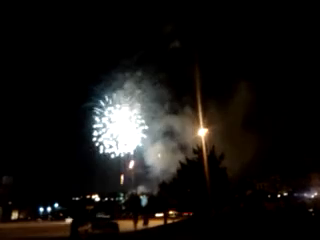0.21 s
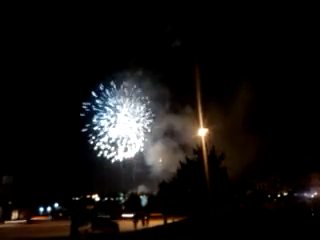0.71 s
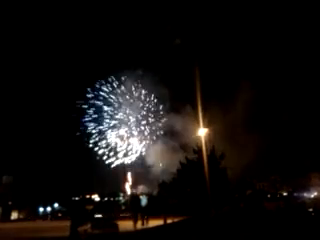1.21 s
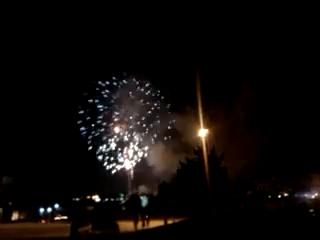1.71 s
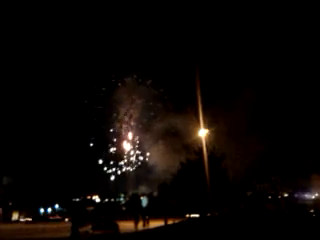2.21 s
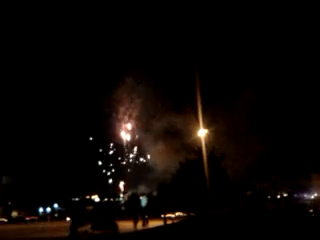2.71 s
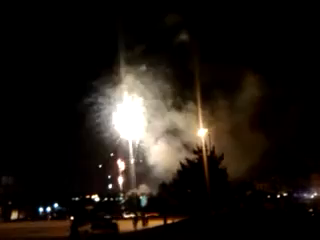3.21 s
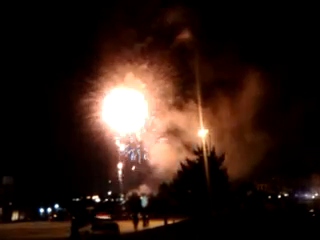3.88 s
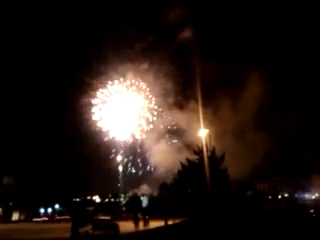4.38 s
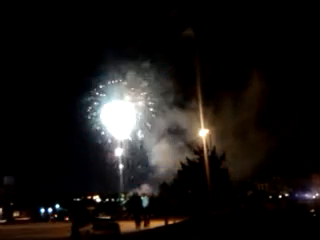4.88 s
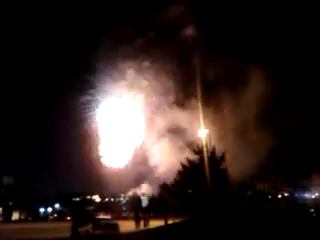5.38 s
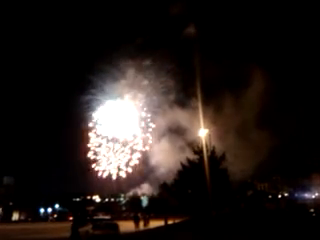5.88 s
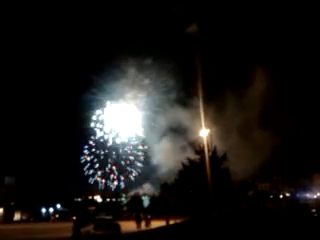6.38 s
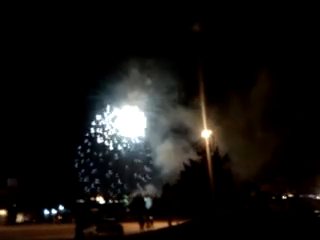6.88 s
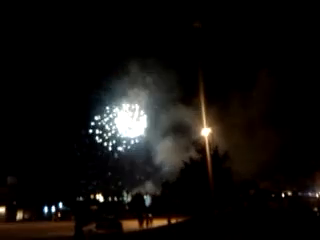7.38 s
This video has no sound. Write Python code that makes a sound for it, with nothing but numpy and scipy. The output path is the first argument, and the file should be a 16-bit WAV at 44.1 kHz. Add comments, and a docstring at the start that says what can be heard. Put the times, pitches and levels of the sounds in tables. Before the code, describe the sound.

Fireworks burst far above an open car park at night. Each shell gives a sharp crack and a low boom, arriving in quick clusters with short gaps and growing densest in the second half. Buildings throw back slaps and an uneven rumble over town hiss and tiny far pops. A cricket chirps faintly twice. A small phone microphone makes it all sound narrow, clipping on the loudest booms.

```python
"""Fireworks over a car park

Shells burst far above an open car park at night, each a sharp crack followed by a dispersed boom.
Buildings send back slaps and a lumpy roll over town noise and far pops; a cricket chirps in two gaps.
A small phone hears it all, passing little above a telephone band and clipping on the loudest booms."""
import sys
import numpy as np
from scipy import signal
from scipy.fft import rfft, irfft
from scipy.io import wavfile
from scipy.ndimage import uniform_filter1d

SR = 44100
rng = np.random.default_rng(int(sys.argv[2]) if len(sys.argv) > 2 else 0)


def put_to_file(sound):
    """Save the sound as 16-bit audio at rate SR, in the file named by the first command-line argument."""
    columns = np.atleast_2d(sound).T  # one column per channel
    safe = np.clip(columns, -1, 1)
    whole_steps = np.round(safe * 32767)
    wavfile.write(sys.argv[1], SR, whole_steps.astype(np.int16))


N = 332955
T = np.arange(N) / SR


def undb(db):
    return 10 ** (np.asarray(db) / 20)


def fall(t, t60):
    """Decay that loses 60 dB in t60 seconds."""
    return np.exp(-np.log(1000) * t / t60)


def coloured(noise, spectrum):
    """Noise shaped by an EQ curve of (Hz, dB) points; rms 1."""
    hz, db = np.transpose(spectrum)
    bins_hz = np.fft.rfftfreq(len(noise), 1 / SR) + 1
    eq = undb(np.interp(np.log(bins_hz), np.log(hz), db))
    shaped = irfft(rfft(noise) * eq, len(noise))
    return shaped / np.sqrt(np.mean(shaped ** 2))


def wander(rate_hz):
    """Smooth random modulation with a spread near 1."""
    hold = int(SR / rate_hz)
    steps = np.repeat(rng.standard_normal(N // hold + 1), hold)
    return 1.24 * uniform_filter1d(uniform_filter1d(steps, hold), hold)[:N]


def lumpy(spectrum, lump_db=0.0, lump_hz=210):
    """Coloured noise with a slow sway in level and optional quicker lumps."""
    level_db = lump_db * wander(lump_hz) + 1.38 * wander(5.5)
    return undb(level_db) * coloured(rng.standard_normal(N), spectrum)


# Level curves for the bed of town noise and far bursts: time_s, rumble_db, hiss_db
TOWN_LEVELS = [(0.0, -32, -43.5), (0.5, -36.5, -45.5), (1.2, -34, -46), (2.3, -31.5, -43),
               (3.0, -35.5, -42.5), (3.8, -30.5, -41), (4.2, -30.5, -42), (5.4, -29.5, -40.5),
               (5.9, -32.5, -43.5), (7.0, -32, -39.5), (7.55, -31.5, -43)]
def town_bed():
    """The distant town drifts in level; returns the power of its rumble and of its hiss."""
    time_s, rumble_db, hiss_db = np.transpose(TOWN_LEVELS)
    return undb(np.interp(T, time_s, rumble_db)) ** 2, undb(np.interp(T, time_s, hiss_db)) ** 2


# EQ of the low roll, fullest near 150 Hz: frequency_hz, gain_db
RUMBLE_EQ = [(15, -80.5), (25, -67), (89, -7.5), (129, -1), (154, 1), (224, -6), (284, -7), (500, -24.5),
             (650, -49.5), (1100, -120)]
def rumble(power):
    """Town rumble and booms returning off buildings merge into one lumpy roll."""
    return np.sqrt(power) * lumpy(RUMBLE_EQ, lump_db=2.38, lump_hz=30)


# EQ of the midrange hiss: frequency_hz, gain_db
HISS_EQ = [(240, -14.5), (400, 2.5), (476, -6), (647, -0.5), (738, -0.5), (2570, -7.5), (3250, -9.5),
           (4110, -22.5), (4600, -63.5), (5980, -86), (10100, -120)]
def hiss(power):
    """Town hiss and the far wash of the cracks, with a light flutter."""
    return np.sqrt(power) * lumpy(HISS_EQ, lump_db=1.39, lump_hz=56)


def far_pops(scatter_db, t60, count):
    """Small far pops, each ringing briefly at its own pitch; rms 1."""
    out, t = np.zeros(N + SR), T[:SR // 25]
    for when, pitch, faintness in rng.random((count, 3)):
        i = int(when * N)
        ring = np.sin(2 * np.pi * 450 * 8 ** pitch * t) * fall(t, t60)  # 450 to 3600 Hz
        gain = undb(-scatter_db * np.log(faintness + 0.038)) / 1.6 ** pitch
        out[i:i + len(t)] += gain * ring
    return out[:N] / np.sqrt(np.mean(out[:N] ** 2))


def crack(t, pitch_hz, knock_db, noise, t60):
    """A shock front: a blast pulse the microphone's bass cut turns into a knock, a snap, ragged noise."""
    late = (t - .001).clip(0)
    blast = -(1 - late / 0.0017) * np.exp(-late / 0.004) * (1 - np.exp(-late / 0.000081))
    bass_cut = signal.cheby1(4, 2., 170, "high", fs=SR, output="sos")
    knock = signal.sosfilt(bass_cut, blast + 1e-18)
    snap = -np.sin(2 * np.pi * pitch_hz * t) * fall(t, 0.53 * t60) * (1 - np.exp(-t / .0004))
    ringing = signal.lfilter(*signal.iirpeak(min(pitch_hz, 4000), Q=3., fs=SR), noise)
    ragged = (undb(-9) * noise + undb(0.5) * ringing) * fall(t, t60) * (1 - np.exp(-t / 0.0011))
    return undb(knock_db) * knock + undb(-2) * snap + ragged


def boom(t, pitch_hz, length_s):
    """The lows come a little late: a few cycles swell fast, slide down in pitch and stop."""
    turns = pitch_hz * (t + .003 * (1 - np.exp(-t / 0.0089)))
    progress = np.clip(t / length_s, 0, 1)
    swell = (1 - np.exp(-t / 0.0026)) ** 2 * (1 - progress ** 2) ** 1.11
    # A deep thump, as from the phone overloading on big booms.
    overload_thump = np.sin(2 * np.pi * progress) * np.sin(np.pi * progress)
    return -np.sin(2 * np.pi * turns + .5) * swell + undb(-30) * overload_thump


# EQ of the cracks and their echoes, where the phone's top resonance rasps: frequency_hz, gain_db
RASP_EQ = [(240, -21), (400, 1.5), (590, -4.5), (640, -12), (1090, -4.5), (1490, -10.5), (1760, -7.5),
           (3350, -9), (4600, -33), (5980, -69.5), (10100, -120)]
# Bangs, one a row: shell bursts, their fore-cracks and single slaps off walls.
# start_s, crack_db, crack_hz, knock_db (re crack), boom_db, boom_hz, boom_cycles, echo_db (re bang)
BANGS = [(0.081, -29.5, 1770, -12, -31.5, 229, 3.3, -15), (0.187, -23.5, 980, 9, -18, 146, 3.7, -26),
         (0.833, -29, 600, 5, -10, 108.6, 3.7, -20), (0.837, -5, 830, -12, 2.5, 152.6, 2.9, -20.5),
         (0.879, -16.5, 3080, 7, -14, 160, 5, -20.5), (0.894, -12.5, 590, 2, -14.5, 133, 2.1, -18),
         (0.902, -12.5, 590, 12.5, -18, 246, 7, -14), (0.913, -11.5, 1140, -3, -17.5, 210, 5.5, -16),
         (0.949, -26, 654, -8, -13.5, 181, 3.6, -21.5), (1.281, -16, 680, 15.5, 1.5, 174.7, 3.8, -15.5),
         (1.293, -4.5, 700, 0, -1.5, 163.5, 3.5, -15), (1.35, -11.5, 1720, 3, -11, 228, 6.5, -14),
         (1.371, -10, 1830, 4, -13, 208, 6.9, -18), (1.381, -1.5, 617, 3.5, -0.5, 151.3, 4.9, -17.5),
         (1.424, -18.5, 3470, -11, -11.5, 180, 3.7, -14), (1.449, -4, 1110, -7, -16.5, 152, 2.9, -18.5),
         (1.905, -19.5, 2720, 18.5, -9.5, 170, 3, -16.5), (1.993, -16, 684, 10.5, -17, 168, 2.7, -21),
         (2.026, -11.5, 1000, 8, -12.5, 187, 2.5, -15.5), (2.058, -14, 1050, 11, -33, 176, 2.3, -17.5),
         (2.437, -2.5, 630, 3.5, 2.5, 167.7, 3, -15), (2.454, -7, 860, -9, 1.5, 139, 2.6, -16),
         (2.468, -22, 920, -1, -6.5, 169, 5.3, -20.5), (2.48, -9.5, 960, -6, -2.5, 158, 3.4, -20),
         (2.509, -19.5, 3440, -0.5, -17, 194, 2.6, -10), (2.556, -20, 3280, 1, -11, 172.5, 3.4, -13.5),
         (2.877, -23.5, 644, 8, -17, 132, 2.4, -20), (3.026, -20.5, 745, 7.5, -15.5, 117, 2.8, -18.5),
         (3.07, -8.5, 746, 0, -9, 246, 6.1, -15), (3.075, -6, 640, 2, 2.5, 161.6, 3.2, -14.5),
         (3.097, -24, 614, 2, -1, 144.5, 2.45, -15), (3.11, -13, 870, 5.5, -7.5, 201, 2.6, -16),
         (3.124, -8, 910, 4.5, -6.5, 177, 3.6, -17), (3.151, -25, 2770, 7, -14, 150, 6.1, -11.5),
         (3.184, -14, 590, 9, -11, 168.4, 4.2, -18.5), (3.199, -30.5, 920, 0.4, -8.5, 119, 2.4, -19),
         (3.499, -12.5, 1525, -5, -18, 141, 1.8, -27), (3.533, -17, 1040, 3, -17.5, 193, 3.3, -26),
         (3.538, -12.5, 1640, -12, -15.5, 181, 2.7, -22.5), (3.604, -25, 1160, 10, -26, 220, 2.8, -16),
         (4.162, -8.5, 577, 9, 0, 187, 1.53, -16), (4.169, -4.5, 750, 5, 1.5, 147.5, 3.7, -15.5),
         (4.181, -9.5, 1130, 8.5, -2, 151, 2.4, -20.5), (4.202, -13, 1360, 2, -21, 143, 2.7, -12),
         (4.226, -2.5, 1050, -9, -25, 189, 4, -8), (4.269, -9.5, 720, 4, -17, 123, 3.5, -12),
         (4.465, -6, 926, 3, 0.5, 176.7, 5.4, -16), (4.508, -20, 1050, 12, -21, 210, 3.4, -17),
         (4.597, -8.5, 947, 12.5, -2.5, 195, 4.4, -17.5), (4.613, -17.5, 604, 16, -5, 121, 2.7, -14),
         (4.655, -2, 680, 1.5, -7.5, 160, 1.7, -19.5), (4.683, -7.5, 1000, 5, -0.5, 204.6, 3.3, -15),
         (4.725, -16.5, 1410, -11, -9, 127, 4.7, -18), (4.758, -9.5, 1740, -5, -7, 193, 2.9, -18),
         (4.929, -37, 700, -1, -12, 165, 3.1, -28), (5.155, -27.5, 1230, 6.5, -22.5, 142, 4, -13),
         (5.56, -32.5, 1010, -3, -23, 160, 4.4, -20.5), (5.822, -38, 600, 2, -24, 162, 6.3, -24.5),
         (5.974, -7.5, 930, -7, 1.5, 151, 3.5, -11.5), (5.994, -6.5, 595, 4.5, 4.5, 117.7, 2.7, -19.5),
         (6.023, -8, 603, 4, -10, 212, 3.4, -18.5), (6.071, -14.5, 960, -3, -14.5, 109, 2.9, -10.5),
         (6.097, -6, 676, 10.5, 0.5, 173.5, 3.4, -17.5), (6.118, -25, 3330, 5, -6.5, 154, 5.3, -16.5),
         (6.148, -5.5, 705, -4, 0, 214, 4.6, -16.5), (6.25, -21, 960, 5, -14, 187, 5.3, -19),
         (6.305, -6.5, 748, 5, -11, 234, 3.8, -22), (6.601, -24.5, 1070, 4, -20.5, 151, 3.8, -21.5),
         (6.658, -22.5, 775, 7, -34, 131, 1.9, -21.5), (6.731, -41, 614, -2, -19, 121, 4.9, -18),
         (6.78, -10, 980, 6.5, 0.5, 197.6, 3.4, -15.5), (6.853, -19, 740, 9, -23.5, 238, 6.8, -15),
         (6.894, -19.5, 2690, -1.5, -14.5, 185, 2.8, -16.5), (7.273, -22.5, 860, 6.5, -20, 199, 3.2, -22),
         (7.48, -31, 1690, 14, -21, 164, 3.6, -21)]
def bangs():
    """Each bang layers a crack and a boom; returns them and the power sent to low and high echoes."""
    out, low_send, high_send = np.zeros(N + SR), np.zeros(N), np.zeros(N)
    t = T[:SR // 4]
    noise = coloured(rng.standard_normal(N + SR), RASP_EQ)
    for start_s, crack_db, crack_hz, knock_db, boom_db, boom_hz, boom_cycles, echo_db in BANGS:
        i, boom_s = int(start_s * SR), boom_cycles / boom_hz
        span = slice(i, i + len(t))
        out[span] += undb(crack_db) * crack(t, crack_hz, knock_db, noise[span], t60=0.038)
        out[span] += undb(boom_db) * boom(t, boom_hz, boom_s)
        low_send[min(i + int(.8 * boom_s * SR), N - 1)] += undb(boom_db + echo_db) ** 2
        # Walls return the crack a little weaker than the boom, and thin slaps echo little.
        treble_trim_db = -3 + 0.45 * (boom_db - crack_db)
        high_send[i] += undb(crack_db + echo_db + treble_trim_db) ** 2
    return out[:N], low_send, high_send


def tail(send, t60, build_s):
    """Reflected power gathers after each hit, then dies away."""
    decaying = signal.lfilter([1], [1, -fall(2 / SR, t60)], send)
    step = 1 / (build_s * SR)
    return signal.lfilter([step], [1, step - 1], decaying)


def building_echoes(send, near_t60, far_t60, far_db, far_build_s):
    """Echo power: near walls answer quickly; far blocks swell late and ring long."""
    near = tail(send, near_t60, build_s=0.0042)
    return near + undb(far_db) ** 2 * tail(send, far_t60, far_build_s)


# Cricket chirps in the gaps between bangs: start_s, pitch_hz, level_db
CRICKET_CHIRPS = [(4.078, 3120, -43), (7.387, 3080, -46)]
def cricket(stroke_s, rise_per_stroke):
    """Three wing strokes ring one note that creeps up through the chirp."""
    out = np.zeros(N)
    for start_s, pitch_hz, level_db in CRICKET_CHIRPS:
        strokes = np.clip((T - start_s) / stroke_s, 0, 3)
        note_hz = pitch_hz * (1 + rise_per_stroke * strokes) + 30 * wander(80)
        note = np.sin(2 * np.pi * np.cumsum(note_hz) / SR)
        pulses = np.abs(np.sin(np.pi * strokes)) ** 0.44
        out += undb(level_db) * pulses * note
    return out


def scene():
    """Mono mix: bangs up front, their echoes swelling the town bed, and the cricket."""
    town_low, town_high = town_bed()
    hits, low_send, high_send = bangs()
    low_echo = building_echoes(low_send, near_t60=0.48, far_t60=2.2, far_db=-11.5, far_build_s=0.027)
    high_echo = building_echoes(high_send, near_t60=0.45, far_t60=0.62, far_db=-17.5, far_build_s=0.012)
    far_wash = undb(-14) ** 2 * tail(high_send, t60=1.78, build_s=0.09)
    roll = rumble(town_low + low_echo)
    rasp = np.sqrt(high_echo) * lumpy(RASP_EQ)
    air = hiss(town_high + far_wash)
    pop_gain = undb(-6) * np.sqrt(town_high + far_wash + high_echo)  # rides under the hiss and rasp
    pops = pop_gain * far_pops(scatter_db=5.0, t60=0.012, count=2500)
    chirps = cricket(stroke_s=0.026, rise_per_stroke=0.007)
    return (hits + roll + rasp + air + pops + chirps)[None]


def record(dry):
    """The phone's port rings atop the telephone band; only hard-clipped edges reach the high treble."""
    port = dry + undb(-3.5) * signal.lfilter(*signal.iirpeak(3350, Q=5., fs=SR), dry)
    dulled = signal.sosfilt(signal.butter(4, 3900, fs=SR, output="sos"), port)
    band = signal.sosfilt(signal.ellip(8, .2, 80, 4300, fs=SR, output="sos"), dulled)
    clipped = np.clip(band, -.72, .72)
    return signal.sosfilt(signal.ellip(8, .2, 70, 16000, fs=SR, output="sos"), clipped)


dry = scene()
out = record(dry)
put_to_file(out)
```